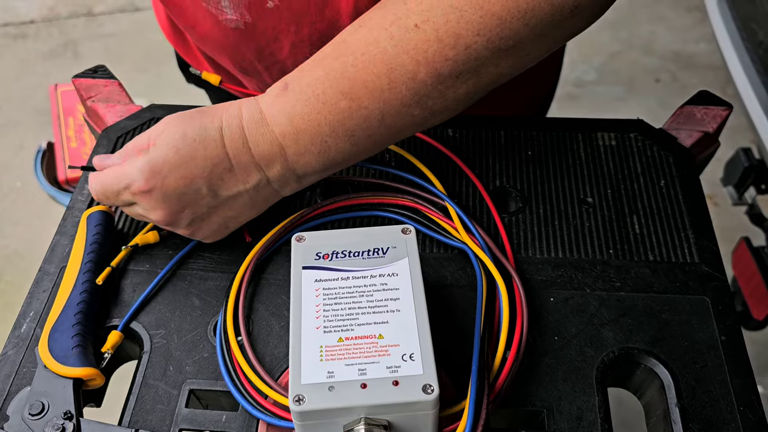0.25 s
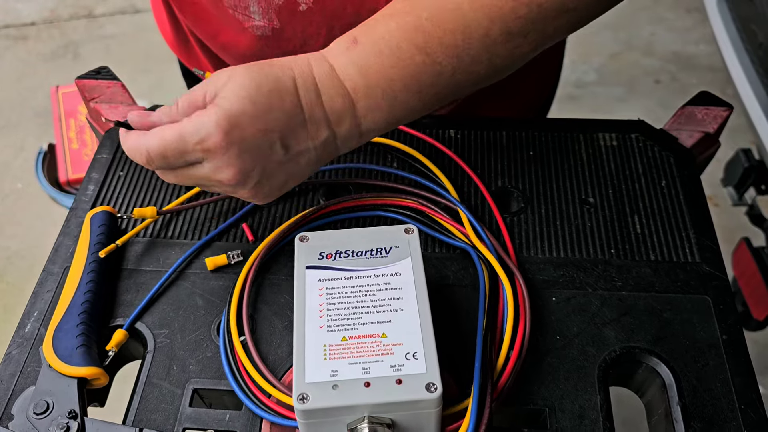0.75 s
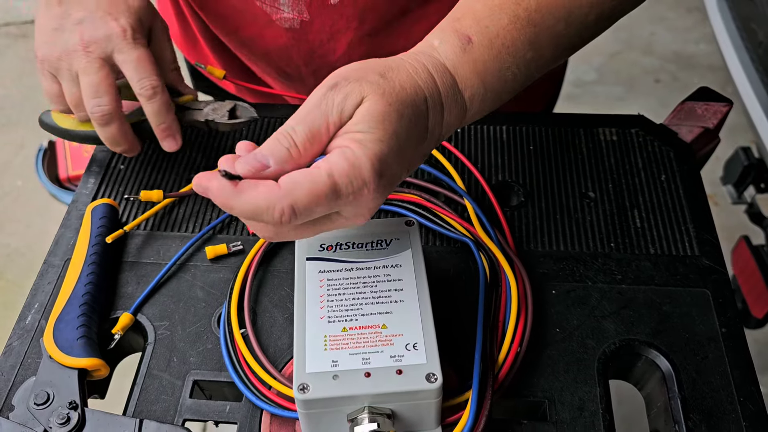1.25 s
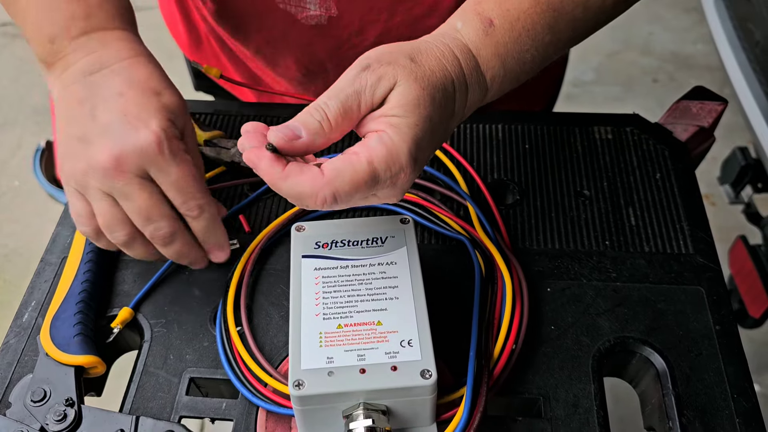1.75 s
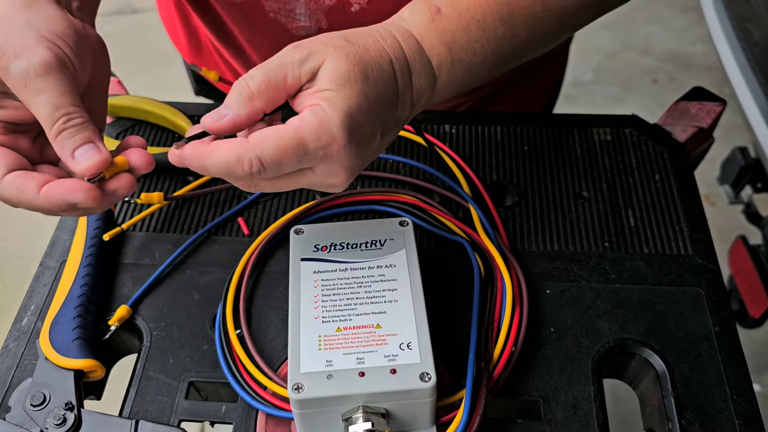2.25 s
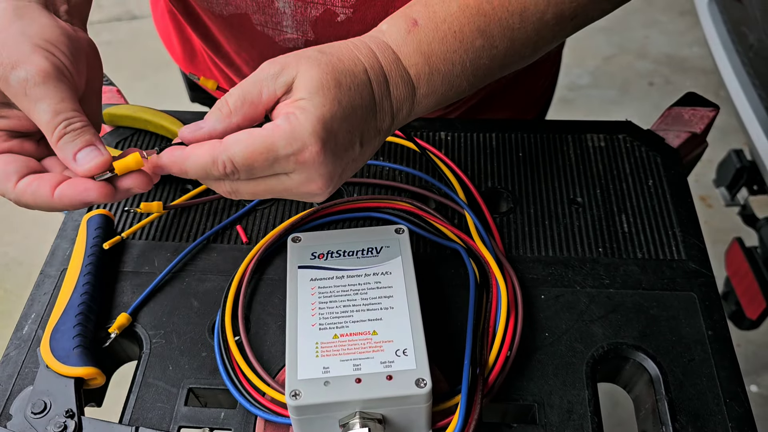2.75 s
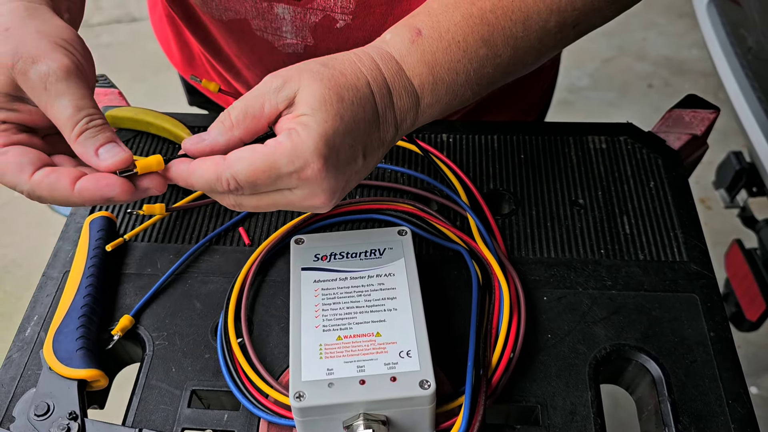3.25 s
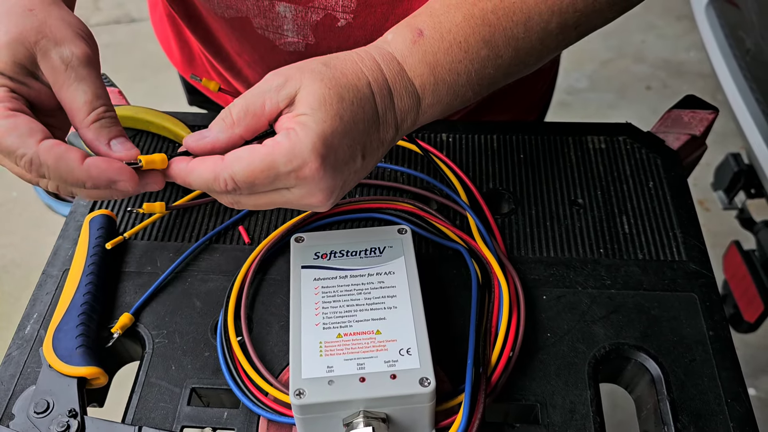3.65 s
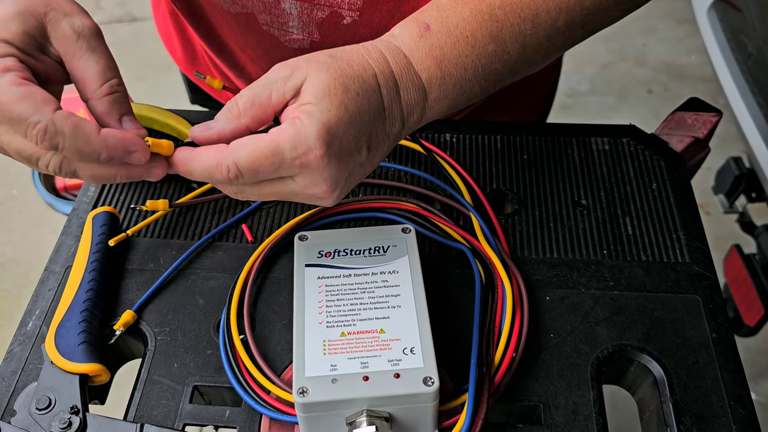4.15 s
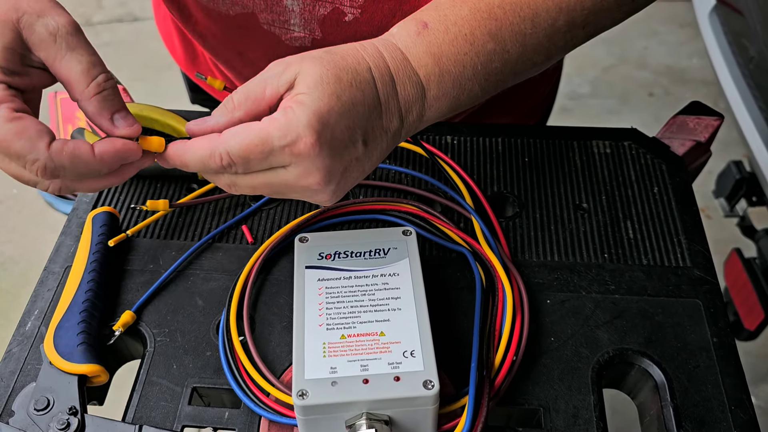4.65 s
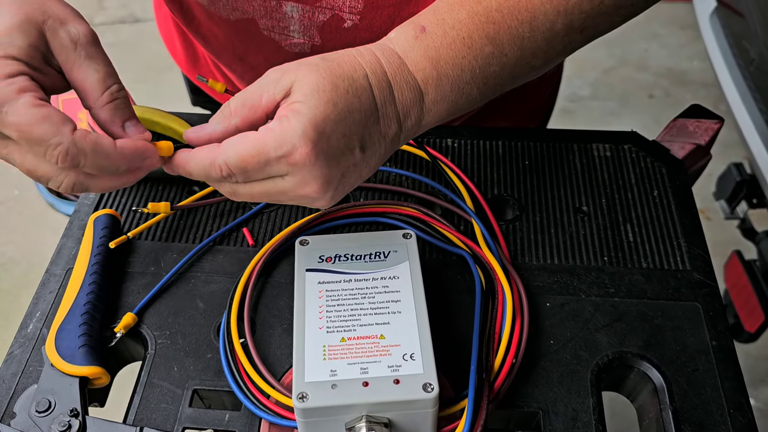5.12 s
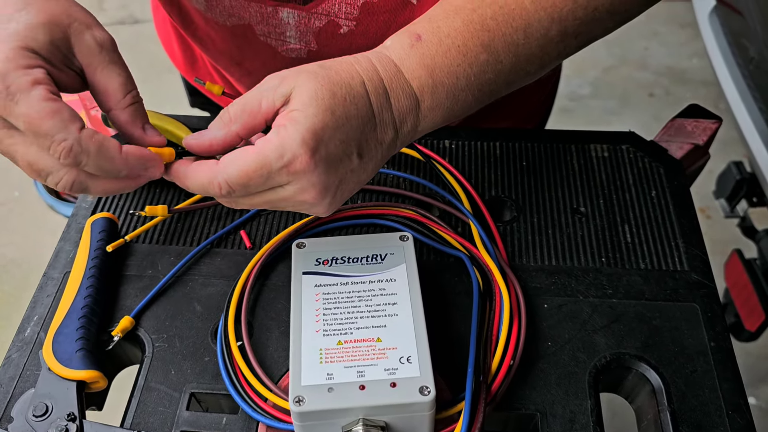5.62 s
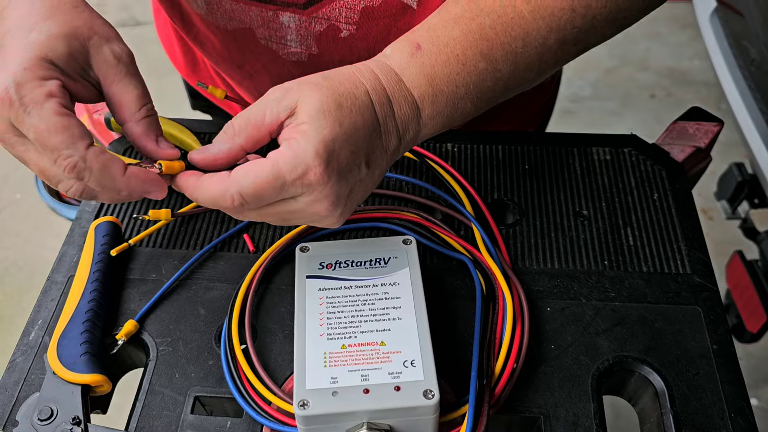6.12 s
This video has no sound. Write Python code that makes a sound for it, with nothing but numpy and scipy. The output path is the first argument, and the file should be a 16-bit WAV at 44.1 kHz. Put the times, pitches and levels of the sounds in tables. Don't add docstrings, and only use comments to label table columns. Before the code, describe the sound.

Close to the microphone on a plastic table outdoors, fingers tap faintly and cutters snip a wire. A small metal terminal drops and rattles in quick tinny bounces, followed by a bright spring snap. After a short gap the cutters land with a hollow double thud and steel clack, then fingertips click the terminal as they pick it up. Low mains hum, distant road rumble, insects and faint birds continue alone.

```python
import sys
import numpy as np
from scipy import signal
from scipy.fft import rfft, irfft
from scipy.io import wavfile
from scipy.ndimage import map_coordinates

SR = 44100
rng = np.random.default_rng(int(sys.argv[2]) if len(sys.argv) > 2 else 0)


def file_out(sig):
    cols = np.atleast_2d(sig).T
    lim = np.clip(cols, -1, 1)
    pcm = np.round(lim * 32767).astype(np.int16)
    wavfile.write(sys.argv[1], SR, pcm)


def convert_level_to_amplitude(level_db):
    exponent = np.asarray(level_db, float) / 20
    return 10 ** exponent


N = 281358

# (frequency [Hz], level [dB per Hz])
RUMBLE_SPECTRUM = [(11, -43.5), (18, -26), (48, -0.5), (68, 1), (91, -5.5), (107, 0), (124, -3.5),
                   (138, -5), (151, -12.5), (236, -17.5), (266, -23.5), (363, -31.5), (450, -31),
                   (580, -51), (990, -120)]
# (frequency [Hz], level [dB per Hz])
TYRE_SPECTRUM = [(180, -17), (300, -1.5), (370, -2.5), (503, -6.5), (804, 1), (1150, -5.5), (1660, -1.5),
                 (2180, -11.5), (2620, -20.5), (3310, -21), (3840, -25), (4510, -27), (5430, -33),
                 (5700, -28), (7410, -53), (12500, -120)]
# (time [s], level [dB])
TRAFFIC_SWELL = [(0.0, -51), (0.48, -51.5), (0.66, -49.5), (1.37, -49), (1.69, -49), (2.18, -50.5),
                 (2.47, -51), (2.86, -52), (4.16, -50.5), (5.1, -50.5), (5.33, -52.5), (6.38, -51)]
# (frequency [Hz], level [dB rms])
HUM_LINES = [
    (60, -59),
    (120, -54.5),
    (240, -68.5),
]
# (start [s], hold [s], firing rate [Hz], level [dB])
TRUCK_PULLS = [
    (1.559, 0.12, 71.2, -43.5),
    (2.658, 0.393, 69, -42),
]
# (frequency [Hz], level [dB per Hz])
CHORUS_SPECTRUM = [(3240, -39), (5500, -23.5), (5850, -15), (6010, -10), (6070, -2.5), (6510, 1.5),
                   (6580, 2.5), (6970, -1), (7380, -8), (8100, -28), (9000, -34), (11700, -52),
                   (19800, -120)]
CHIRP_STARTS = [.17, .54, .92, 1.3, 1.72, 2.1, 2.47, 2.91, 3.3, 3.75, 4.11, 4.55, 4.94, 5.33, 5.66, 6.05]
# (time [s], length [s], pitch [Hz], glide [Hz], level [dB])
BIRD_CALLS = [(0.416, 0.044, 1252, -13, -59.5), (0.531, 0.26, 1399, -59, -58.5),
              (.985, .058, 1340, 90, -51.5), (1.035, .035, 1300, -70, -62.5), (1.345, 0.054, 1334, 80, -53),
              (1.047, .069, 3600, 18.5, -79.5), (1.723, 0.032, 2330, -31, -77),
              (3.029, 0.22, 3600, -100, -80.5), (3.855, .08, 3170, 62, -84),
              (3.967, 0.34, 2870, -220, -82.5), (4.06, 0.244, 3200, -70, -82.5),
              (4.567, .06, 3350, 40, -82), (4.7, 0.081, 2930, 20, -79), (4.721, 0.2, 3390, -30.5, -84),
              (4.79, .13, 3200, 5, -84), (4.563, 0.092, 1340, 4.5, -68)]
# (frequency [Hz], level [dB per Hz])
TREBLE_HISS_SPECTRUM = [(5000, -23), (8500, -14.5), (8960, -3.5), (9590, -1), (10200, -14), (11300, 1.5),
                        (11800, 3.5), (12600, -3.5), (15100, 0.5), (15900, -6.5)]
# (frequency [Hz], share [0-1])
PORT_LIKENESS = [(60, 1), (150, 0.96), (300, 0.99), (500, 0.69), (900, 0.53), (1400, 0.05), (6000, 0),
                 (9000, 0), (11000, 0)]
# (frequency [Hz], left over right [dB])
PORT_TILT = [(60, 1), (200, 4), (380, 0.5), (550, 6), (950, -0.5), (1600, 11.5), (2500, 9.5), (3200, 3),
             (5000, 5), (6200, 1), (10500, -1), (11500, 7.5)]
# (start [s], hold [s], level [dB], brightness [dB])
RUB_STROKES = [(0.0, .13, -73, -1.5), (0.308, .004, -61.5, -25), (0.338, .045, -67.5, -16),
               (.45, .03, -79, -5), (0.498, .012, -55.5, -3), (0.617, .045, -50.5, -9),
               (0.672, .06, -55, -11), (0.743, .08, -73.5, -11), (0.825, .008, -62.5, -6),
               (0.929, .003, -67, -12), (1.021, .003, -68.5, -13.5), (1.34, .006, -65, -23.5),
               (1.378, .06, -61, -2.5), (1.833, .033, -49, -8), (1.88, .06, -68.5, -17.5),
               (2.111, .08, -91, 3), (3.83, 0.13, -80, -11), (3.971, .24, -81.5, -17),
               (4.268, .01, -84, -3), (5.59, 0.019, -83, -11)]
# (time [s], middle peak [dB], table body [dB], bright edge [dB])
FIDGET_TOUCHES = [
    (0.0437, -42, -65, -68),
    (0.1034, -58, -63, -65),
    (0.115, -60, -73, -62),
    (0.129, -62, -57, -60.5),
    (0.307, -59, -49, -82),
    (0.377, -51, -49, -78.5),
    (0.5007, -24, -37.5, -48),
    (0.511, -44.5, -59.5, -54.5),
]
# (time [s], middle peak [dB], table body [dB], bright edge [dB])
TERMINAL_BOUNCES = [
    (.6179, -10.5, -25.5, -33.5),
    (.6274, -18, -39.5, -43.5),
    (.6449, -25, -29, -54),
    (.6584, -31, -46.5, -51),
    (.6754, -22.5, -37.5, -46.5),
    (.6904, -33, -45, -47),
    (.7118, -31.5, -43.5, -51.5),
    (.7244, -36, -49, -59.5),
]
# (time [s], middle peak [dB], table body [dB], bright edge [dB])
SPRING_SNAPS = [
    (0.8382, -12.5, -47, -37),
    (0.8437, -21, -45.5, -46.5),
    (0.8566, -41.5, -54, -61),
]
# (time [s], middle peak [dB], table body [dB], bright edge [dB])
CUTTER_LANDINGS = [
    (1.3852, -11.5, -14.5, -39.5),
    (1.4014, -13.5, -1.5, -33.5),
    (1.4067, -12, -11, -33),
    (1.4124, -21.5, -13.5, -47),
    (1.4234, -29, -12.5, -50),
    (1.439, -42, -29.5, -59),
]
# (time [s], middle peak [dB], table body [dB], bright edge [dB])
PICKUP_TOUCHES = [
    (1.8306, -45, -36, -54.5),
    (1.8361, -24.5, -38, -38),
    (1.843, -22, -50, -38),
    (1.8457, -29.5, -36, -45),
    (1.852, -39, -41, -56),
    (1.8585, -46, -35, -54),
    (1.8664, -45, -43, -52.5),
]
# (frequency [Hz], level [dB], t60 [s])
FINGER_BODY = [(320, -3.5, 0.065), (970, -2, 0.033), (2170, -5.5, .02), (3900, 0.5, 0.007),
               (7400, -16, .01), (10800, -5, 0.025), (11760, -1, 0.012)]
# (frequency [Hz], level [dB], t60 [s])
TERMINAL_BODY = [(304, -4.5, 0.067), (372.5, -4, 0.041), (970, -4, 0.022), (1217, 0, 0.02114),
                 (1900, -3, 0.01465), (3220, -17, 0.0152), (4205, -8.5, .012), (6320, -23, 0.14),
                 (7350, -10.5, 0.01097), (9055, -18, .13), (10900, -14.5, 0.1986), (11600, 2.5, .01)]
# (frequency [Hz], level [dB], t60 [s])
SPRING_BODY = [(1340, -6, 0.068), (1540, -12, .02), (3070, -7, 0.038), (5280, -7.5, 0.018),
               (5660, -6, 0.014), (7290, -6, 0.018), (8160, -1.5, 0.013), (11300, -3.5, 0.013),
               (11800, -4, 0.036), (12600, -5, .01), (13200, -2.5, .01)]
# (frequency [Hz], level [dB], t60 [s])
THUD_BODY = [(73, 0.5, 0.13), (119, -7, 0.14), (168.6, -16.5, 0.18), (239, -9, 0.071), (258, -8.5, 0.1),
             (300, -11.5, 0.049), (372, -7.5, .04), (409.3, 0, 0.044), (432, -11, .12),
             (475.8, -12.5, 0.079), (511.6, -5.5, 0.056), (621, -4.5, 0.028), (690.4, -13.5, 0.025),
             (814, -4, .035),
             (930, -23, 0.027), (1210, -18, 0.041), (1390, -16.5, 0.025), (1611, -1, 0.023),
              (1856, -1.5, .02), (2321, -6, 0.018), (3410, -8, 0.016), (3800, 3.5, 0.007),
              (4550, -1, 0.0062), (7350, -5, 0.0091)]

RIGHT_LAG_S = 0.0003
CONTACT_DELAY_S = 0.00064


def rms_one(x):
    return x / np.sqrt(np.mean(x ** 2) + 1e-20)


def lean(db):
    return convert_level_to_amplitude([[db], [-db]])


def at_hz(points, hz):
    table_hz, values = np.transpose(points)
    return np.interp(np.log(hz), np.log(table_hz), values)


def band(x, low_hz, high_hz):
    sos = signal.butter(2, [low_hz, min(high_hz, SR / 2.2)], "band", fs=SR, output="sos")
    return signal.sosfilt(sos, x)


def drift(rate_hz):
    knots = rng.standard_normal(400)
    return map_coordinates(knots, [np.arange(N) / SR * rate_hz], order=3)


def fade(x, t60):
    return signal.lfilter([1], [1, -convert_level_to_amplitude(-60 / (t60 * SR))], x + 1e-18)


def ring(clicks, hz, t60):
    r, w = convert_level_to_amplitude(-60 / (t60 * SR)), 2 * np.pi * hz / SR
    return signal.lfilter([0, np.sin(w)], [1, -2 * r * np.cos(w), r * r], clicks + 1e-18)


def gesture_db(start, hold, rise_db_per_s, fall_db_per_s):
    t = np.arange(N) / SR - start
    return np.minimum(0, np.minimum(rise_db_per_s * t, fall_db_per_s * (hold - t)))


def ports(pair, split_hz):
    low = signal.sosfilt(signal.butter(1, split_hz, fs=SR, output="sos"), pair)
    return pair - low + low.sum(0) / np.sqrt(2)


def far_noise(spectrum):
    hz = np.arange(1, N // 2 + 2) * SR / N
    inside = (hz > spectrum[0][0]) & (hz < spectrum[-1][0])
    shared, left, right = rfft(rng.standard_normal((3, N))) * convert_level_to_amplitude(at_hz(spectrum, hz)) * inside
    alike = np.clip(at_hz(PORT_LIKENESS, hz), 0, 1)
    tilt = convert_level_to_amplitude(at_hz(PORT_TILT, hz) / 2)
    late = np.exp(-2j * np.pi * hz * RIGHT_LAG_S)
    at_left = np.sqrt(alike) * shared + np.sqrt(1 - alike) * left
    at_right = np.sqrt(alike) * shared * late + np.sqrt(1 - alike) * right
    out = irfft(np.array([at_left * tilt, at_right / tilt]), N)
    return out / out.mean(0).std()


def treble_hiss():
    return convert_level_to_amplitude(-89.5) * far_noise(TREBLE_HISS_SPECTRUM)


def mains_hum():
    t, out = np.arange(N) / SR, np.zeros(N)
    for hz, db in HUM_LINES:
        level = convert_level_to_amplitude(db + 2.5 + 1.7 * drift(3.7))
        out += level * np.sin(2 * np.pi * hz * t + rng.uniform(0, 6.22))
    return out * lean(0.8)


def road():
    s, db = np.transpose(TRAFFIC_SWELL)
    swell_db = np.interp(np.arange(N) / SR, s, db)
    swell_db = swell_db - swell_db.mean()
    rumble = convert_level_to_amplitude(-47 + 0.91 * swell_db) * far_noise(RUMBLE_SPECTRUM)
    tyres = convert_level_to_amplitude(-61.5 + 0.54 * swell_db + 0.42 * drift(5)) * far_noise(TYRE_SPECTRUM)
    return rumble + tyres


def truck():
    t, out = np.arange(N) / SR, np.zeros(N)
    for s, hold, hz, db in TRUCK_PULLS:
        sag_hz = 24 * np.clip(t - s - hold, 0, 1)
        phase = 2 * np.pi * np.cumsum(hz - sag_hz) / SR
        load = convert_level_to_amplitude(db + gesture_db(s, hold, rise_db_per_s=89.5, fall_db_per_s=90))
        out += load * (np.sin(phase) + convert_level_to_amplitude(-11.0) * np.sin(2 * phase))
    return out * lean(0.8)


def birds():
    out = np.zeros(N)
    waver, flutter = drift(50), drift(39)
    hoarse = 1 + 0.45 * rms_one(band(rng.standard_normal(N), 20, 110))
    for s, length, pitch_hz, glide_hz, db in BIRD_CALLS:
        u = np.arange(int(length * SR)) / (length * SR)
        span = slice(int(s * SR), int(s * SR) + len(u))
        hz = (pitch_hz + glide_hz * (u - 0.5)) * (1 + 0.007 * waver[span])
        breath = convert_level_to_amplitude(db + 7.0 + 2.5 * flutter[span]) * np.sin(np.pi * u) ** 0.7
        out[span] += breath * np.sin(2 * np.pi * np.cumsum(hz) / SR)
    out = out * hoarse
    t = np.arange(int(0.1 * SR)) / SR
    echoes = rng.standard_normal((2, len(t))) * convert_level_to_amplitude(-33.5 - 60 * t / 0.08)
    echoed = signal.fftconvolve(out[None], echoes, axes=1)[:, :N]
    return (convert_level_to_amplitude(-3.5) * out + echoed) * lean(2.0)


def insect_chorus():
    return convert_level_to_amplitude(-69 - 0.6 + 1.2 * drift(2.92) + 1.38 * drift(30)) * far_noise(CHORUS_SPECTRUM)


def cricket():
    t, strokes = np.arange(N) / SR, np.zeros(N)
    for s in CHIRP_STARTS:
        for k, db in enumerate(rng.normal(0, 2.2, 4)):
            strokes += convert_level_to_amplitude(db) * np.exp(-((t - s - 0.026 * k) / 0.011) ** 2)
    tone = np.sin(2 * np.pi * 6272 * t + 1.0 * drift(39))
    return convert_level_to_amplitude(-67.5) * strokes * tone * lean(2.5)


def surroundings(x):
    t = np.arange(int(0.5 * SR)) / SR
    out = np.zeros_like(x)
    # (low [Hz], high [Hz], t60 [s], level [dB])
    for low_hz, high_hz, t60, db in [(350, 640, 0.32, -45.5), (708, 2500, 0.29, -47.5),
                                     (2495, 7300, 0.15, -45.5), (6000, 16000, 0.27, -47.5)]:
        noise = ports(rng.standard_normal((2, len(t))), 700)
        onset = np.clip(t / 0.0085, 0, 1)
        blur = band(noise, low_hz, high_hz) * convert_level_to_amplitude(db - 60 * t / t60) * onset
        out += signal.fftconvolve(x, blur, axes=1)[:, :N]
    return out


def rubbing():
    grains = rng.standard_normal((2, N)) * convert_level_to_amplitude(3.0 * drift(60)) * convert_level_to_amplitude(1.9 * rng.exponential(1, N))
    dull, bright = rms_one(band(grains, 590.4, 4476)), rms_one(band(grains, 8600, 15000))
    pressure, edge = 0, 0
    for s, hold, db, bright_db in RUB_STROKES:
        stroke = convert_level_to_amplitude(db + gesture_db(s, hold, rise_db_per_s=2600.5, fall_db_per_s=1200))
        pressure = pressure + stroke
        edge = edge + convert_level_to_amplitude(bright_db) * stroke
    return convert_level_to_amplitude(5.5) * pressure * dull + convert_level_to_amplitude(3.0) * edge * bright * lean(2.5)


def contacts(rows, modes, crack_t60, crack_db, ring_db, left_db, soft_hz, sign=1):
    s, middle_db, dull_db, bright_db = np.transpose(rows)
    at = np.round((s + CONTACT_DELAY_S) * SR).astype(int)
    out = np.zeros((2, N))
    ranges = [(60, 1500, dull_db), (1500, 7500, middle_db - 14.5), (7570, 14000, bright_db)]
    softness = signal.butter(2, soft_hz, fs=SR, output="sos")
    for i, (low, high, level_db) in enumerate(ranges):
        clicks = np.zeros(N)
        clicks[at] = convert_level_to_amplitude(level_db)
        build_up = fade(clicks, crack_t60[i]) - fade(clicks, 0.0017)
        burst = build_up * ports(rng.standard_normal((2, N)), 700)
        part = convert_level_to_amplitude(crack_db[i]) * band(band(burst, low, high), low / 0.69, high * 1.8)
        for hz, db, mode_t60 in modes:
            if not low <= hz < high:
                continue
            spot = rng.standard_normal((len(at), 1))
            ear = rng.standard_normal((len(at), 2))
            uneven = np.zeros((2, N))
            uneven[:, at] = convert_level_to_amplitude(2 * spot + 2 * ear * min(hz / 1500, 1)).T
            if hz > 900:
                push = 0.34 * fade(clicks * uneven, 0.007) * rng.standard_normal((2, N))
            else:
                push = sign * signal.sosfilt(softness, clicks * uneven)
            part += convert_level_to_amplitude(db + ring_db[i]) * ring(push, hz, mode_t60)
        out += part * lean(left_db[i] / 2)
    return band(out, 160, 19000)


def fidget_and_snip():
    return contacts(FIDGET_TOUCHES, FINGER_BODY, (0.015, 0.009, 0.009), (13, 14, 14), (-9, -3, -6),
                    (1.5, 2.5, 5), soft_hz=2500)


def pick_up():
    return contacts(PICKUP_TOUCHES, FINGER_BODY, (0.025, 0.008, 0.008), (14, 18, 16), (-6, 3, -2.5),
                    (0.5, 1.2, 4), soft_hz=2510)


def spring_snap():
    return contacts(SPRING_SNAPS, SPRING_BODY, (0.02, 0.012, 0.008), (12, 12, 18), (-3, 1.5, 5),
                    (1.5, 1.5, 3), soft_hz=2500)


def terminal_drop():
    return contacts(TERMINAL_BOUNCES, TERMINAL_BODY, (0.02, 0.013, 0.008), (13, 14, 15), (-7, 2.5, 1.5),
                    (0.3, 0.3, 4), soft_hz=2500)


def cutters_down():
    return contacts(CUTTER_LANDINGS, THUD_BODY, (0.03, 0.011, 0.007), (1.5, 12, 16),
                    (-3, 5, -3), (-1.5, -1.8, -1.5), soft_hz=1090, sign=-0.9)


def at_microphone(near):
    short_waves = band(near[1], 500, 19000)
    near[1] += np.roll(short_waves, round(RIGHT_LAG_S * SR)) - short_waves
    near[0] += 0.7 * band(near[0], 10500, 17000)
    near += surroundings(near)
    return near - 0.2 * band(near, 8800, 10400)


def scene():
    far = treble_hiss() + mains_hum() + road() + truck() + birds() + insect_chorus() + cricket()
    near = rubbing() + fidget_and_snip() + terminal_drop() + spring_snap() + cutters_down() + pick_up()
    return far + at_microphone(near)


def top_cut(x):
    return signal.sosfilt(signal.butter(12, 16440, fs=SR, output="sos"), x)


def record(dry):
    cut = signal.cheby2(16, 50, 16700, fs=SR, output="sos")
    return top_cut(signal.sosfilt(cut, np.clip(dry, -1, 1)))


dry = scene()
out = record(dry)
file_out(out)
```